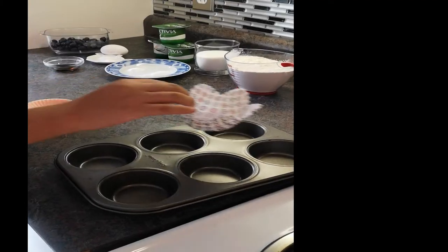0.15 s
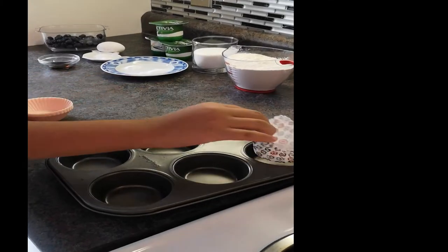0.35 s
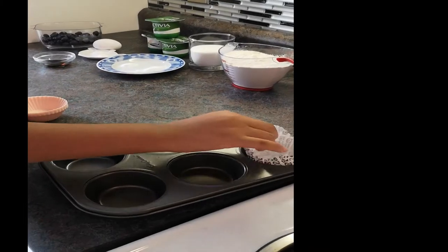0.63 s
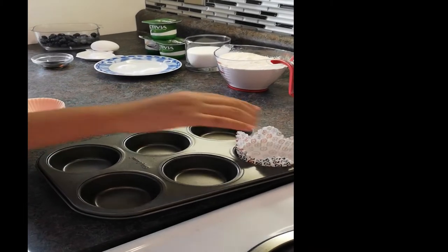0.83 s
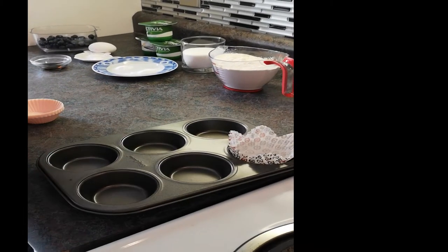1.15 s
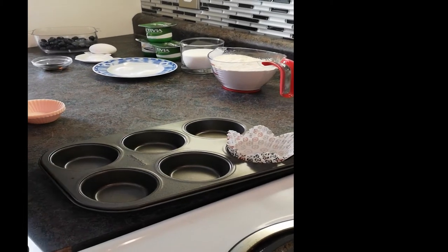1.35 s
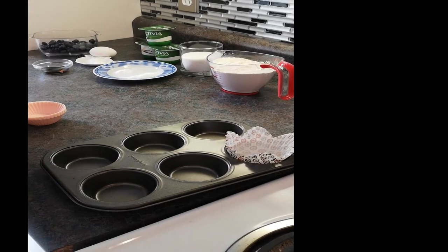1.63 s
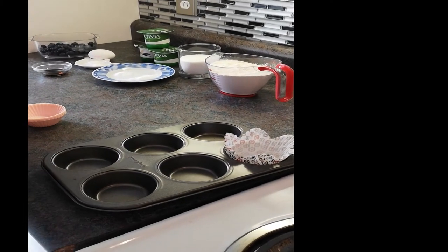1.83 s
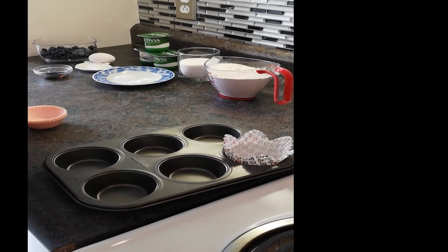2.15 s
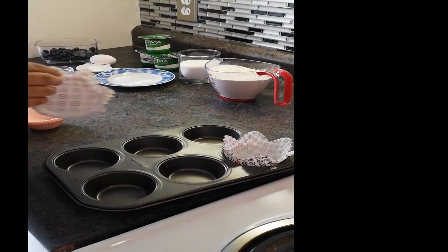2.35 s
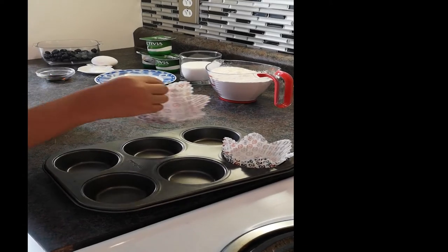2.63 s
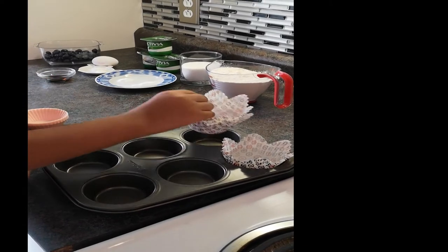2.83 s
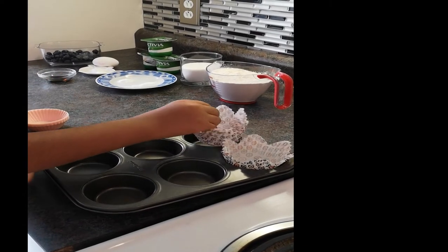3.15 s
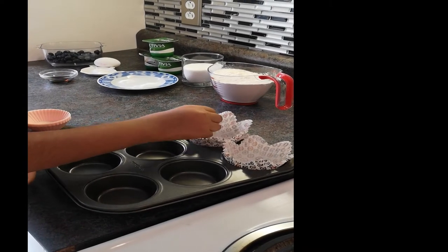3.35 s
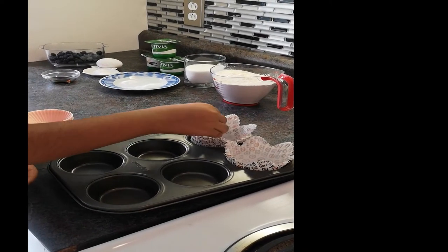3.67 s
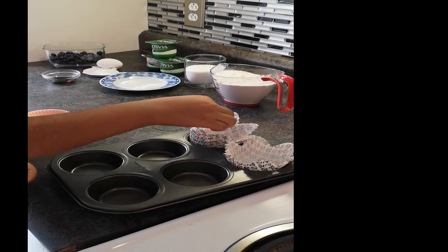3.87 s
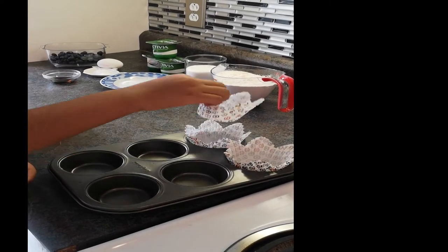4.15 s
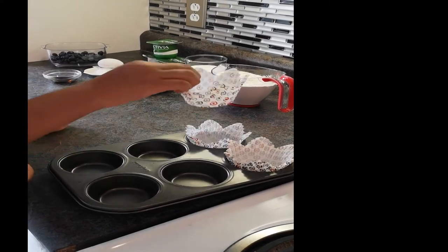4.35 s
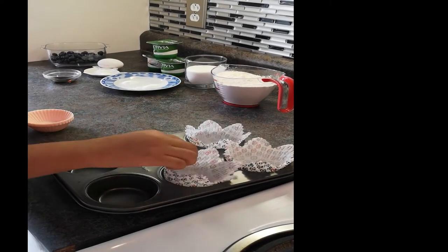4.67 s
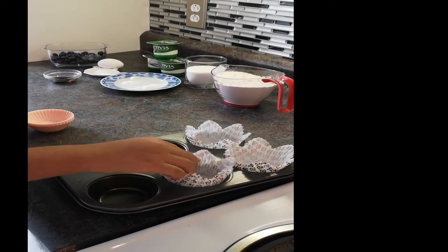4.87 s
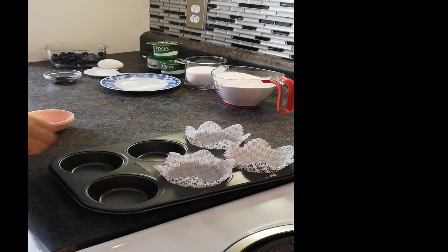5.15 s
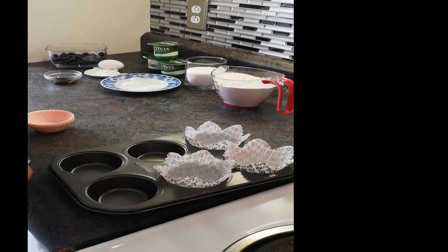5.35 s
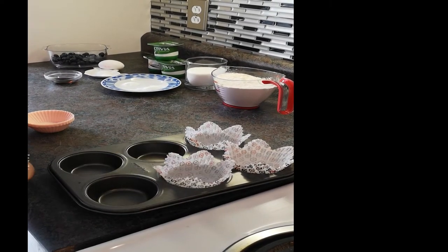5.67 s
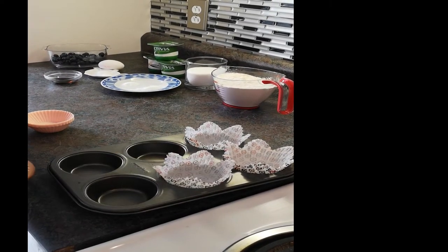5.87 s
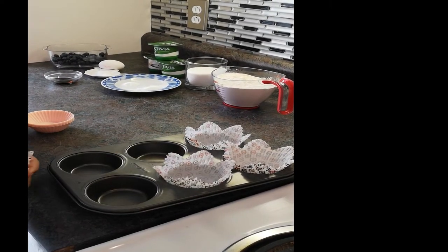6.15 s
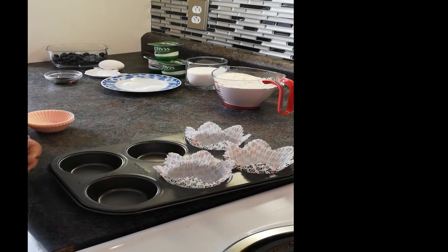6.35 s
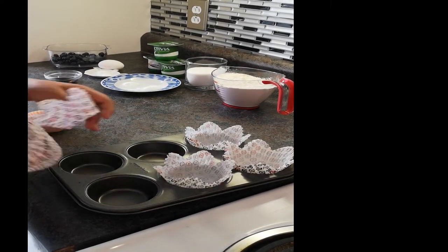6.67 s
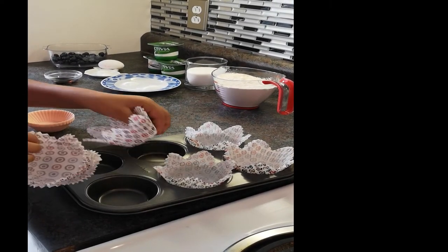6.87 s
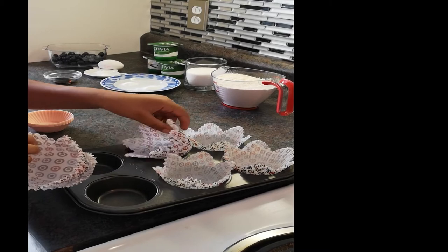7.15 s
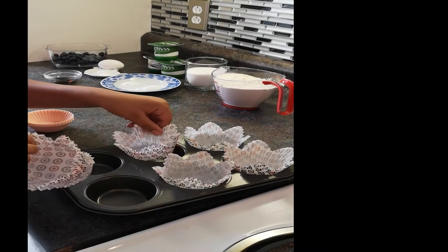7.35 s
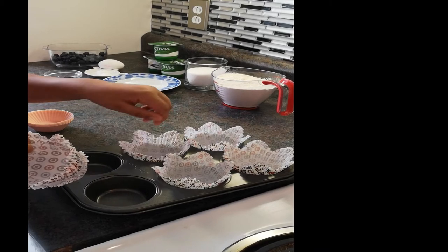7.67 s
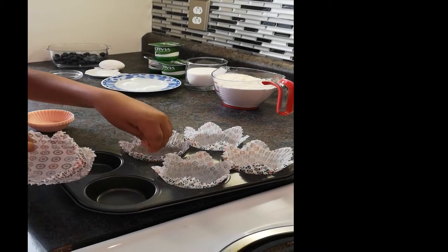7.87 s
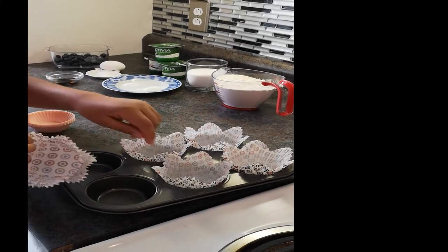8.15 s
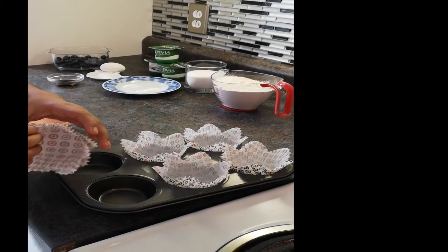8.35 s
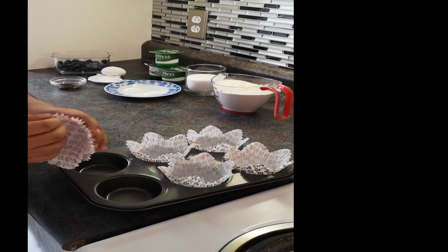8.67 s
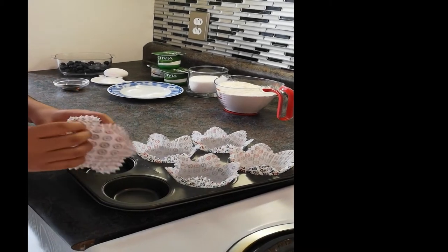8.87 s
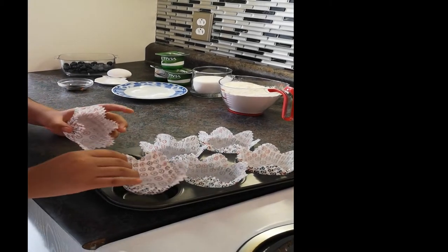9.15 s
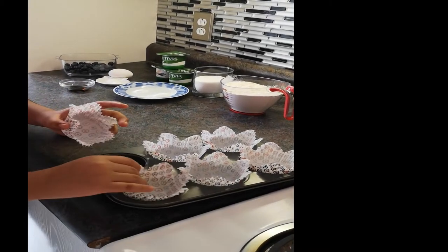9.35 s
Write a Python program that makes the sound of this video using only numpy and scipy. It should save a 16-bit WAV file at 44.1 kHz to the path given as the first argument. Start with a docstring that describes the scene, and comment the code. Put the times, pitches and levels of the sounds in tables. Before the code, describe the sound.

Thin paper baking liners rustle, peel and crackle as they are pressed into a metal muffin tin, over faint kitchen rumble and hum.

```python
"""The low rumble of a room and an appliance hum come first, then a soft bump on a kitchen counter.
Paper baking liners are peeled off a stack and pressed into a metal muffin tin.
Sliding pleats hiss: noise, tiny slips that ring facets, and ticks. Buckling folds, and the first bump's
dull contact, are bursts of cracks; rubbed edges sing as noise-driven modes; flexing sheets flutter as
low filtered noise. Bumps ring the counter's modes; coloured noise rumbles, wavering sines hum."""
import sys
import numpy as np
from scipy import signal
from scipy.fft import rfft, irfft, next_fast_len
from scipy.io import wavfile
from scipy.ndimage import uniform_filter1d

SR = 44100
rng = np.random.default_rng(int(sys.argv[2]) if len(sys.argv) > 2 else 0)


def wav_record(signal):
    """Record a signal, one row per channel, as 16-bit PCM in the file named by sys.argv[1]."""
    frames = np.transpose(np.atleast_2d(signal))
    bounded = np.clip(frames, -1, 1)
    # unit amplitude maps onto the largest positive 16-bit level
    quanta = np.round(bounded * 32767).astype(np.int16)
    wavfile.write(sys.argv[1], SR, quanta)


N = 419391
TIME = np.arange(N) / SR  # s


def from_db(db):
    """Decibels to gain."""
    return 10 ** (np.asarray(db) / 20)


def rms_one(x):
    """Scale to unit power."""
    return x / np.sqrt(np.mean(x ** 2) + 1e-20)


def drift(rate_hz):
    """Smooth random wander of spread 1, with rate_hz knots per second."""
    knots = rng.standard_normal(8192)
    return rms_one(np.interp(TIME * rate_hz, np.arange(len(knots)), knots))


def bell(age_s, half_length_s):
    """Gaussian swell of height 1, down to 1/e at the half length."""
    return np.exp(-(age_s / half_length_s) ** 2)


def colour(x, points):
    """Causal (minimum-phase) filter that follows a table of (Hz, dB)."""
    size = 2 * next_fast_len(N // 2 + 8192)
    hz, db = np.transpose(points)
    bins_hz = np.arange(size // 2 + 1) * SR / size
    log_gain = np.log(from_db(np.interp(np.log(bins_hz + 1), np.log(hz), db)))
    # folding the cepstrum onto positive time gives minimum phase
    cepstrum = irfft(log_gain)[:size // 2]
    cepstrum[1:] *= 2
    return irfft(rfft(x, size) * np.exp(rfft(cepstrum, size)))[..., :N]


def cut(x, hz, kind, order=2):
    """Butterworth low- or high-pass."""
    sos = signal.butter(order, min(hz, .45 * SR), kind, fs=SR, output="sos")
    return signal.sosfilt(sos, x + 1e-18)


def ring(x, hz, t60_s):
    """One mode: a unit click sets a decaying sine ringing."""
    r = from_db(-60 / (t60_s * SR))
    w = 2 * np.pi * hz / SR
    return signal.lfilter([0, np.sin(w)], [1, -2 * r * np.cos(w), r * r], x + 1e-18)


def brighten(x, treble_db, split_hz=3600):
    """See-saw the treble against the body."""
    low = cut(x, split_hz, "low", order=1)
    return low * from_db(-treble_db / 2) + (x - low) * from_db(treble_db / 2)


def with_cup(x, hz, cup_db, width_hz):
    """The paper cup rings along with whatever shakes it, at a pitch that may move."""
    turn = np.exp(2j * np.pi * np.cumsum(np.broadcast_to(hz, x.shape)) / SR)
    r = np.exp(-np.pi * width_hz / SR)
    # shift the mode to 0 Hz, smooth, shift back
    mode = 2 * np.real(turn * signal.lfilter([1 - r], [1, -r], x / turn))
    return x + from_db(cup_db) * mode


def stroke_gain(age_s, swell_s, hold_s, swell_power=1.12, sag_db_per_s=27.5,
                release_db_per_s=256, relax_db=-24, relax_db_per_s=54):
    """The hand speeds up, eases and stops; then the bent pleats creep back faintly and slowly."""
    speed = np.clip(age_s / max(swell_s, .002), 0, 1) ** swell_power
    held = from_db(-sag_db_per_s * np.clip(age_s - swell_s, 0, hold_s))
    stopped_s = np.maximum(age_s - swell_s - hold_s, 0)
    release = from_db(-release_db_per_s * stopped_s)
    relax = from_db(relax_db - relax_db_per_s * stopped_s)
    return speed * held * np.hypot(release, relax)


# Strokes that peel a liner off the stack.
# Each row: start in seconds, swell in seconds, hold in seconds, relative level in dB, treble lift in dB.
PEEL_STROKES = [(1.036, 0.015, 0.1, -54, 8), (1.196, 0.33, 0.24, -50, 0.5), (1.679, 0.013, 0.046, -42.5, 3),
                (1.77, 0.11, 0.14, -37.5, 5.5), (2.027, 0.016, 0.09, -48.5, -1),
                (2.146, 0.032, 0.0054, -42.5, 4.5), (2.225, 0.064, 0.051, -38.5, 7),
                (2.47, 0.038, 0.36, -63, -3), (2.814, 0.13, 0.038, -49, 1.5),
                (5.449, 0.011, 0.12, -53.5, 8), (5.582, 0.01, 0.059, -44.5, 6.5),
                (5.655, 0.2, 0.067, -32.5, 10.5), (5.97, 0.1, 0.04, -34.5, 5.5),
                (6.248, 0.027, 0.044, -38, 8), (6.434, 0.075, 0.046, -52, 4), (6.591, 0.004, 0.16, -39, 3),
                (8.291, 0.09, 0.014, -42, 0.5), (8.456, 0.13, 0.015, -38, 2.5),
                (8.621, 0.17, 0.1, -29, 9.5)]
# Strokes that press a liner into the tin. Each row: start in seconds, swell in seconds,
# hold in seconds, relative level in dB, treble lift in dB, body mode of the gripped cup in Hz.
PRESS_STROKES = [(0.573, 0.075, 0.027, -34.5, 5, 1800), (0.854, 0.015, 0.0034, -29.5, -2.5, 1790),
                 (0.902, 0.0064, 0.031, -43.5, -1, 1830), (3.014, 0.0052, 0.014, -24.5, 1, 1780),
                 (3.054, 0.0038, 0.034, -23.5, 0, 2060), (3.172, 0.066, 0.037, -33.5, 0, 1800),
                 (3.318, 0.025, 0.055, -33.5, 13, 1690), (3.401, 0.034, 0.1, -28, 8.5, 1650),
                 (3.663, 0.032, 0.21, -39, 6, 1630), (3.951, 0.084, 0.13, -42.5, 6.5, 1980),
                 (4.229, 0.0065, 0.0096, -55.5, 21, 1770), (4.634, 0.004, 0.043, -42.5, -20, 1730),
                 (4.68, 0.0062, 0.075, -31.5, 11, 1770), (4.815, 0.054, 0.047, -30.5, 8, 1900),
                 (4.993, 0.033, 0.018, -33, 5, 1830), (5.077, 0.024, 0.051, -44, 11, 1820),
                 (6.824, 0.017, 0.085, -48, 11, 2110), (6.963, 0.022, 0.66, -48.5, 7.5, 2030),
                 (7.213, 0.01, 0.045, -34, 0.5, 2040), (7.298, 0.026, 0.025, -35, 5.5, 2550),
                 (7.584, 0.013, 0.053, -34.5, 10.5, 1760), (8.073, 0.049, 0.08, -37, 14.5, 1760),
                 (9.242, 0.0016, 0.14, -37, 6, 2020), (9.383, 0.028, 0.075, -30, 6.5, 2050)]


def handling(loose_cup_hz=2004):
    """Strokes add in power, the louder sets the colour: level dB, treble dB, cup Hz, share in tin."""
    power, treble, pressed = np.full(N, 1e-12), np.zeros(N), np.zeros(N)
    pitch = power * loose_cup_hz
    strokes = [(*row, loose_cup_hz, False) for row in PEEL_STROKES]
    strokes += [(*row, True) for row in PRESS_STROKES]
    for s, swell_s, hold_s, db, treble_db, cup_hz, in_tin in strokes:
        now = slice(round(s * SR), round(s * SR) + SR)
        stroke = (from_db(db) * stroke_gain(TIME[now] - s, swell_s, hold_s)) ** 2
        power[now] += stroke
        treble[now] += stroke * treble_db
        pitch[now] += stroke * cup_hz
        pressed[now] += stroke * in_tin
    return 10 * np.log10(power), treble / power, pitch / power, pressed / power


def crinkle(per_s, spread_db, cycles, shift_db=3, shift_rate_hz=30):
    """Uneven tiny slips each ring one pleat facet for a few cycles; facets come in and out of contact."""
    sizes = from_db(spread_db * np.minimum(rng.exponential(1, N), 4)) * rng.choice([-1, 1], N)
    slips = sizes * (rng.random(N) < per_s / SR)
    facets_hz = np.geomspace(1000, 14000, 12) * rng.uniform(.92, 1.08, 12)
    dealt = rng.integers(0, len(facets_hz), N)
    ringing = np.zeros(N)
    for k, hz in enumerate(facets_hz):
        struck = slips * (dealt == k) * from_db(shift_db * drift(shift_rate_hz))
        ringing += (-1) ** k * hz * ring(struck, hz, cycles / hz)
    return rms_one(ringing / np.sqrt(per_s))


def ticking(per_s=22, spread_db=3, tick_t60_s=0.0092):
    """Now and then one pleat flicks past an edge with a dry tick."""
    flicks = (rng.random(N) < per_s / SR) * from_db(spread_db * rng.uniform(-0.89, 1, N))
    fade = signal.lfilter([1], [1, -from_db(-60 / (tick_t60_s * SR))], flicks + 1e-18)
    return rms_one(fade * rng.standard_normal(N))


def sliding(level_db, treble_db, pressed, slips_per_s=1300, grain_db=-1, hiss_db=-6,
            tick_db=-15, rim_tick_db=4, judder_db=-0.14, judder_rate_hz=110):
    """Hiss, slips and ticks, ticks louder over the rim; harder pushes blend more slips; grip judders."""
    push = from_db((level_db + 40) / 3)
    grain = crinkle(slips_per_s * push, spread_db=3.0, cycles=9.7)
    friction = from_db(grain_db) * grain + from_db(hiss_db) * rng.standard_normal(N)
    friction += from_db(tick_db + rim_tick_db * pressed) * ticking() / np.maximum(push, 1)
    friction = rms_one(friction * from_db(judder_db * drift(judder_rate_hz)))
    return from_db(level_db) * brighten(friction, treble_db)


# Folds that buckle, and the dull contact tick of the first counter bump (0.248 s).
# Each row: start in seconds, relative level in dB, treble lift in dB.
SNAPS_AND_CONTACT = [(0.248,-46.5,-14.5), (0.522,-30.5,-8), (0.5708,-23.5,-2), (0.6288,-17.5,7),
                     (0.834,-29,-2), (0.8765,-13,3), (0.955,-21,5), (1.6865,-24.5,-4), (2.543,-43.5,16),
                     (3.0194,-11.5,5), (3.0567,-10,5), (3.3326,-36,4), (4.6375,-20.5,-14), (4.683,-9,3),
                     (4.8194,-8,9.5), (4.934,-16,-4), (4.996,-21,18), (5.017,-9.5,6), (5.35,-36,4.5),
                     (5.601,-20,-10), (6.2583,-26.5,-11.5), (6.5912,-12.5,10.5), (6.7208,-13,7),
                     (6.8204,-23.5,0), (6.8516,-18.5,-3), (7.11,-28,13), (7.133,-26,16), (7.2255,-18.5,-7),
                     (7.361,-21,-12), (7.478,-23.5,3), (7.56,-24,-8), (7.577,-16.5,-1), (8.471,-34,-16),
                     (8.595,-21.5,-2), (9.2506,-11.5,-6.5), (9.2915,-18,-5), (9.311,-13,1), (9.4828,-19,-4)]


def snapping(spot, spots, cup_hz, attack_s=0.0011, crack_t60_s=0.0087, settle_t60_s=0.12,
             settle_db=-18, ragged_db=5.0, level_db=2.5, cup_db=3, cup_width_hz=170,
             octaves_apart=0.03, high_hz=5600, high_db=2, high_width_hz=450):
    """A fold cracks raggedly, rings near its cup's pitch and a high one, and settles; so does the contact."""
    out, age_s = np.zeros(N + SR), TIME[:SR // 8]
    decay = from_db(-60 * age_s / crack_t60_s) + from_db(settle_db - 60 * age_s / settle_t60_s)
    fade = (1 - np.exp(-age_s / attack_s)) * decay
    for s, snap_db, treble_db in SNAPS_AND_CONTACT[spot::spots]:
        at = round(s * SR)
        cracks, sizes = rng.standard_normal((2, len(age_s)))
        burst = cracks * from_db(ragged_db * sizes) * fade
        near_cup_hz = cup_hz[at] * 2 ** (octaves_apart * rng.standard_normal())
        burst = with_cup(burst, near_cup_hz, cup_db, cup_width_hz)
        burst = with_cup(burst, high_hz * 2 ** (rng.random() - .5), high_db, high_width_hz)
        burst *= np.sqrt(np.sum(fade ** 2) / np.sum(burst ** 2))
        out[at:at + len(age_s)] += from_db(snap_db + level_db) * brighten(burst, treble_db)
    return out[:N]


# Rubbed or flicked edges that sing.
# Each row: middle in seconds, pitch in Hz, relative level in dB, half length in seconds.
EDGE_SQUEAKS = [(2.556,2050,-52,0.012), (2.768,2070,-51.5,0.014), (2.87,5750,-52,0.016),
                (4.824,5000,-17,0.003), (4.905,5270,-28,0.031), (5.029,5270,-29.5,0.032),
                (7.036,1910,-40.5,0.003), (7.132,1850,-40.5,0.0036), (7.485,1760,-42,0.012),
                (7.651,5000,-31.5,0.015)]


def squeaking(cycles=45, level_db=-1):
    """Friction, as noise, keeps one mode of a paper edge ringing for a moment."""
    out = np.zeros(N)
    for s, hz, db, half_length_s in EDGE_SQUEAKS:
        now = np.abs(TIME - s) < .15
        tone = rms_one(ring(rng.standard_normal(SR // 2), hz, cycles / hz))[-np.sum(now):]
        out[now] += from_db(db + level_db) * tone * bell(TIME[now] - s, half_length_s)
    return out


# Hollow modes of a liner seated in a well of the tin.
# Each row: multiple of the cup's body mode (ratio), level in dB.
TIN_WELL_MODES = [(1.55, -15.5), (2.95, -12.5)]


def in_well(x, cup_hz, sharpness=14, wander_octaves=0.08, wander_rate_hz=12, shade_hz=13500):
    """In the tin, hollow modes shift under the fingers; the hand shades the highest treble."""
    for multiple, db in TIN_WELL_MODES:
        hz = multiple * cup_hz * 2 ** (wander_octaves * drift(wander_rate_hz))
        x = with_cup(x, hz, db, hz.mean() / sharpness)
    return cut(x, shade_hz, "low", order=1)


def kitchen(x, direct_db=-9, near_db=2, near_t60_s=0.03, tail_db=-6, low_t60_s=0.22,
            high_t60_s=0.13, split_hz=4000):
    """Direct sound, close reflections off tin and counter, and a short tail, different at each port."""
    age_s = TIME[:SR // 2]
    near, far = rng.standard_normal((2, 2, len(age_s)))
    near = near * from_db(-60 * age_s / near_t60_s) * (age_s > .0002)
    dull = cut(far, split_hz, "low", order=1)
    tail = dull * from_db(-60 * age_s / low_t60_s) + (far - dull) * from_db(-60 * age_s / high_t60_s)
    tail *= age_s > .006
    echo = from_db(near_db) * rms_one(near) + from_db(tail_db) * rms_one(tail)
    echo /= np.sqrt(len(age_s))
    echo[:, 0] += from_db(direct_db)
    # the reflections comb the sound finely but leave its broad colour even
    response = rfft(echo, 2 * len(age_s))
    power = uniform_filter1d(np.abs(response) ** 2, size=220, axis=1)
    echo = irfft(response * np.sqrt(power.mean() / power))[:, :len(age_s)]
    return signal.oaconvolve(x[None], echo, axes=1)[:, :N]


# Colour of the paper at each microphone port. Each row: frequency in Hz, relative level in dB per Hz.
LEFT_PORT_COLOUR = [(150, -9.5), (290, -9.5), (420, -22.5), (590, -18.5), (770, -3.5), (1200, -6.5),
                    (2500, -3), (3300, -7), (6200, -7.5), (7800, -11), (9300, -6), (12000, -19),
                    (15300, -25.5)]
RIGHT_PORT_COLOUR = [(150, -7), (290, -12), (430, -12.5), (590, -15.5), (780, -7.5), (1200, -5), (1620, 4),
                     (2100, 1), (4200, -9), (5100, -5.5), (9800, -11), (15300, -21.5)]


def at_ports(paper, bass_cut_hz=112):
    """Each port colours the paper in its own way; thin paper radiates no bass."""
    left = colour(paper[0], LEFT_PORT_COLOUR)
    right = colour(paper[1], RIGHT_PORT_COLOUR)
    return cut(np.array([left, right]), bass_cut_hz, "high")


# Liners flexing in the hand. Each row: middle in seconds, relative level in dB, half length in seconds.
SHEET_FLEXES = [(4.78, -51.5, 0.11), (6.754, -54, 0.2), (7.297, -52.5, 0.052), (8.782, -53, 0.23)]


def flexing(low_hz=180, high_hz=335, flutter_db=3, flutter_rate_hz=45):
    """Whole sheets bend with a dull, uneven flutter."""
    bend = sum(from_db(db) * bell(TIME - s, half_length_s) for s, db, half_length_s in SHEET_FLEXES)
    flutter = rng.standard_normal(N) * from_db(flutter_db * drift(flutter_rate_hz))
    dull = cut(cut(flutter, low_hz, "high"), high_hz, "low", order=4)
    return bend * rms_one(kitchen(dull))


# Soft bumps on the counter. Each row: start in seconds, relative level in dB.
COUNTER_BUMPS = [(0.251, -50), (1.27, -38), (1.292, -39.5), (1.317, -39.5), (6.448, -57)]
# Modes of the counter. Each row: frequency in Hz, relative level in dB, t60 in seconds.
COUNTER_MODES = [(75.1, -8, 0.68), (105.6, 6, 0.15), (212, -3.5, 0.284), (290, -8, 0.26)]


def bumping(soft_hz=450, scuff_db=-11, scuff_t60_s=0.41, scuff_hz=400, scuff_top_hz=2200):
    """Padded blows ring the low modes of the counter; each leaves a light dying scuff."""
    blows, age_s = np.zeros(N), TIME[:SR // 2]
    for s, db in COUNTER_BUMPS:
        blows[round(s * SR)] = from_db(db)
    fade = signal.oaconvolve(blows, from_db(scuff_db - 60 * age_s / scuff_t60_s))[:N]
    scuff = fade * rng.standard_normal(N)
    scuff = cut(cut(scuff, scuff_hz, "low", order=1), scuff_top_hz, "low")
    padded = cut(blows, soft_hz, "low")
    return scuff + sum(from_db(db) * ring(padded, hz, t60_s) for hz, db, t60_s in COUNTER_MODES)


# Spectrum of the room rumble. Each row: frequency in Hz, relative level in dB per Hz.
ROOM_RUMBLE = [(22, 8), (60, -1.5), (160, -18), (280, -15), (410, -27.5), (620, -34), (1100, -28),
               (1950, -27), (15000, -50.5)]
# Appliance hum. Each row: frequency in Hz, level in dB rms before the waver.
APPLIANCE_HUM = [(59.2, -60), (120, -69), (239.6, -69)]


def background(rumble_db=-53.5, apart_hz=500, hum_waver_db=2.5):
    """Room rumble, alike at both ports in the bass, with a wavering mains and fan hum."""
    mid, side = rng.standard_normal((2, N))
    apart = cut(side, apart_hz, "high") * np.array([[1], [-1]])
    air = rms_one(cut(colour(mid + apart, ROOM_RUMBLE), 12, "high"))
    hum = np.zeros(N)
    for hz, db in APPLIANCE_HUM:
        gain = np.sqrt(2) * from_db(db + hum_waver_db * drift(5))
        hum += gain * np.sin(2 * np.pi * hz * TIME + .5 * drift(5.7))
    return from_db(rumble_db) * air + hum


def scene(slide_db=3.0, roam_db=6, roam_rate_hz=11, rubbed_cup_db=1.5, cup_width_hz=280,
          bend_octaves=0.032, bend_rate_hz=25, spots=3):
    """Contact roams over spots with their own facets and echoes; the cup's mode wavers as it bends."""
    level_db, treble_db, cup_hz, pressed = handling()
    shares = from_db(roam_db * np.array([drift(roam_rate_hz) for _ in range(spots)]))
    shares /= np.sqrt(np.sum(shares ** 2, axis=0))
    paper = kitchen(squeaking())
    for spot, share in enumerate(shares):
        bent_hz = cup_hz * 2 ** (bend_octaves * drift(bend_rate_hz))
        slide = from_db(slide_db) * share * sliding(level_db, treble_db, pressed)
        rubbed = with_cup(slide, bent_hz, rubbed_cup_db, cup_width_hz)
        liner = rubbed + snapping(spot, spots, cup_hz)
        paper += kitchen(in_well(liner * pressed, cup_hz) + liner * (1 - pressed))
    return at_ports(paper) + flexing() + bumping() + background()


def record(dry, start_s=.082, fade_s=.004, cutoff_hz=15700):
    """The sound fades in quickly after a moment of silence; the top is cut steeply."""
    opened = np.clip((TIME - start_s) / fade_s, 0, 1)
    steep = signal.ellip(10, .2, 70, cutoff_hz, fs=SR, output="sos")
    return signal.sosfilt(steep, dry * opened)


dry = scene()
out = record(dry)
wav_record(out)
```